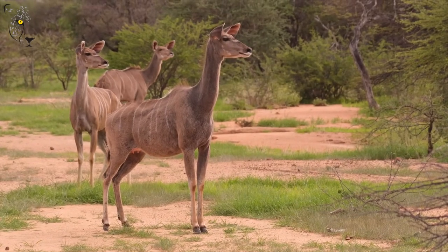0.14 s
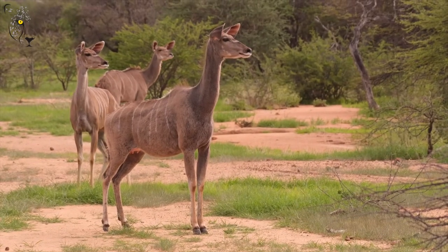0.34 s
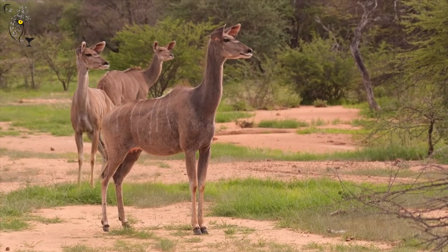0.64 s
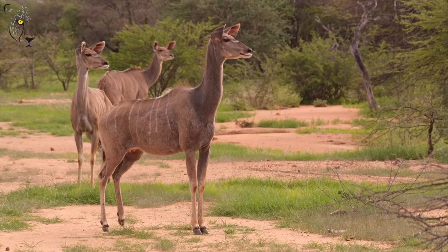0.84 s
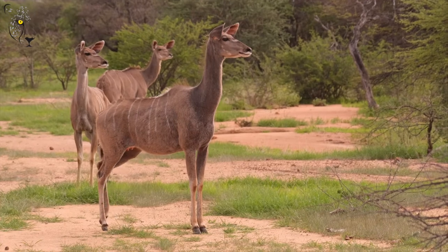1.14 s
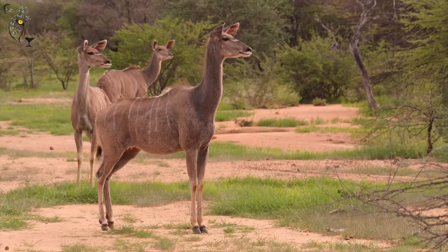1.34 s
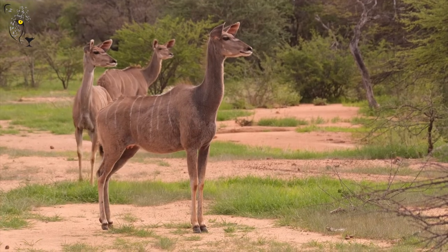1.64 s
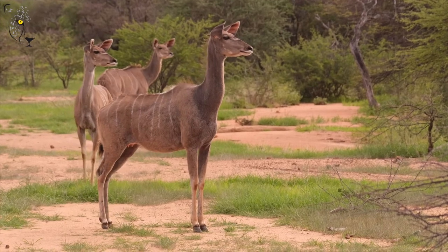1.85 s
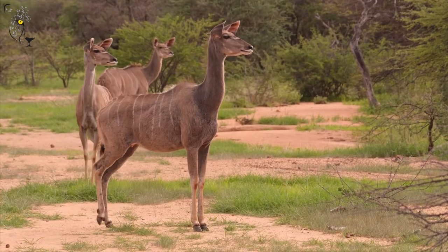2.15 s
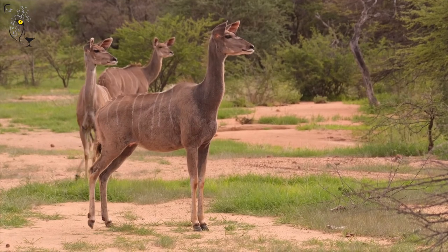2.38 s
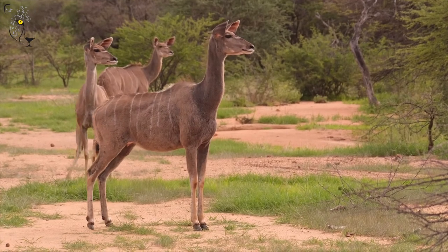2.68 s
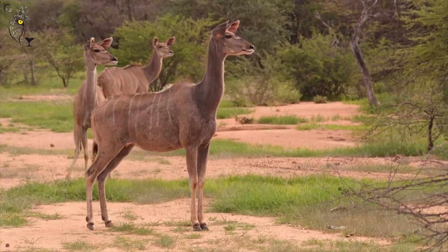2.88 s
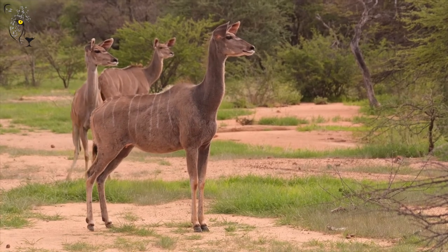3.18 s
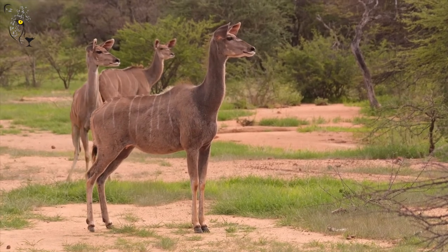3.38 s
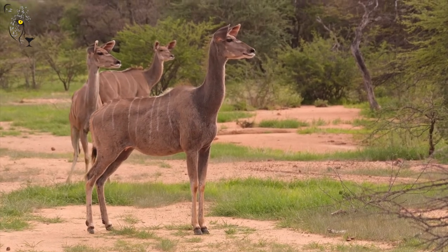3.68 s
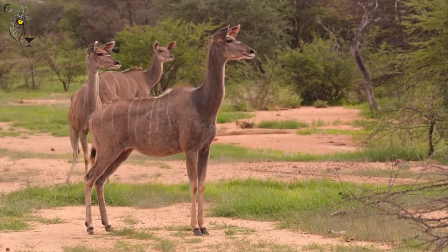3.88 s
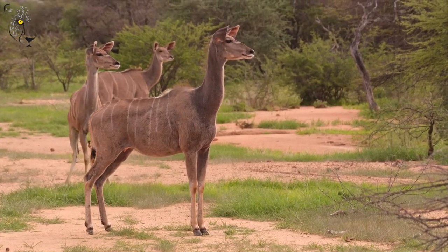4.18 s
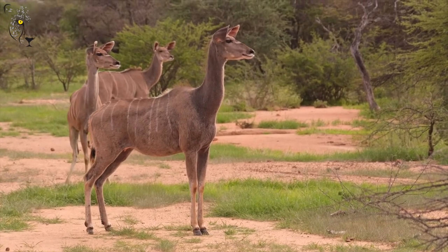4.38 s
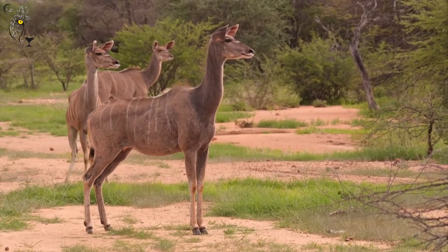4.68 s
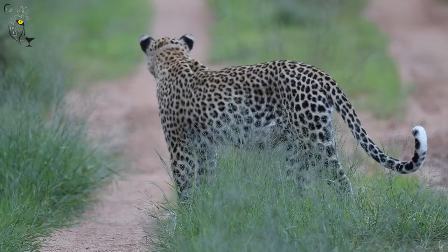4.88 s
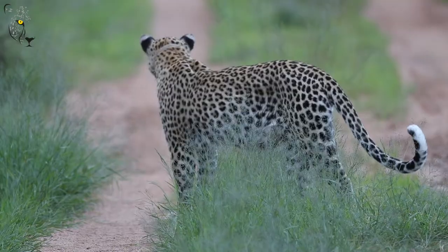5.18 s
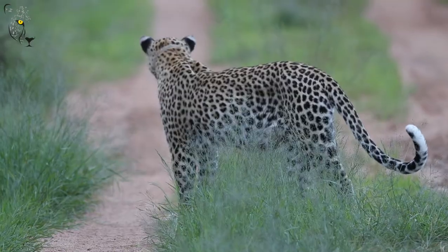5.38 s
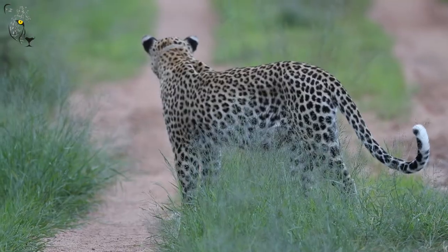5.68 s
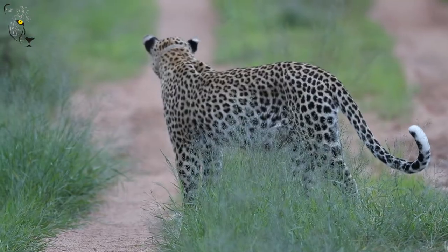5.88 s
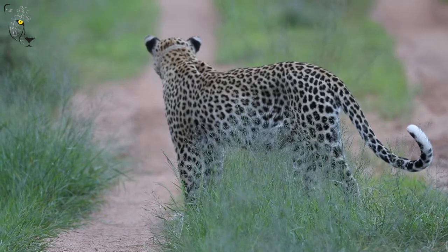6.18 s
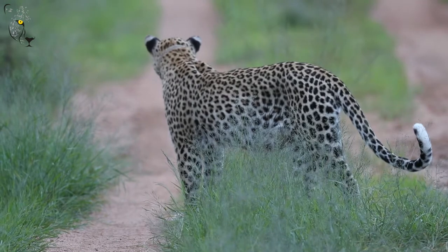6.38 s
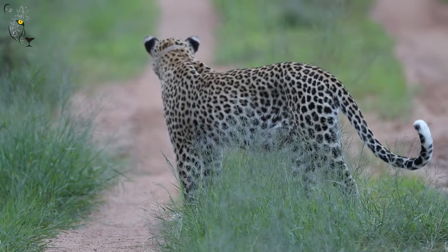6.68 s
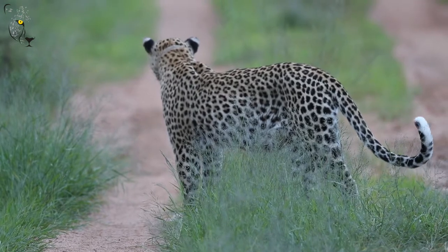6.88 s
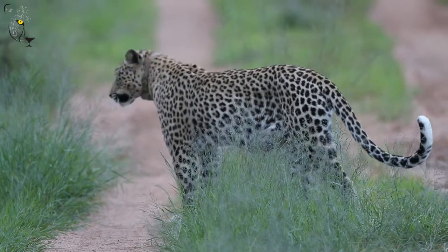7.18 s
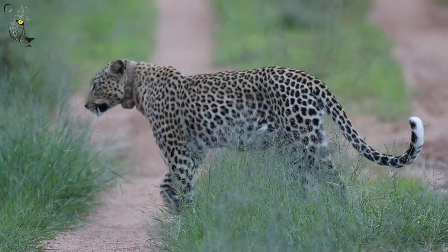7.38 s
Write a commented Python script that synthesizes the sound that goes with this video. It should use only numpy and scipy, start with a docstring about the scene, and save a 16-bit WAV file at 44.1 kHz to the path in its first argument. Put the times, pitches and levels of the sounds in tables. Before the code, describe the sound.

In open bush, a loud hoarse antelope alarm bark is already sounding at 0 seconds, ending by about 0.2, rough and breathy with bright upper resonances; trees return a diffuse echo until about 0.8. A quieter low-voiced bird repeats a phrase about every 1.4 seconds: a half-second bubbling trill of sliding notes, a short hoot, then an arched hoot. Trills begin near 0.1, 1.5, 2.9, 4.3, 5.7 and 7.2. Small birds whistle thin swept tones around 0.4-0.9 and again at 3.0-3.1. Two dull knocks fall near 0.75, with faint ticks scattered until 5.9. Light wind gusts rumble low on the microphone, mainly on the right, easing after 6; soft, nearly centred hiss swells slightly with leaves. At 6.6-6.9 a second hoarse bark erupts, deeper in the chest, with a low puff and an echo cut off around 7.05. The last trill continues to the end.

```python
"""Two hoarse antelope alarm barks in open bush, the first with higher upper resonances: chopped breath
excites resonances, and trees echo it. A low-voiced bird repeats a phrase of gliding tones: a bubbling
trill, a short hoot, an arched hoot. Smaller birds whistle swept tones in two brief clusters.
A few knocks and ticks are noise bursts. Light wind and a low puff with the second bark, both low
coloured noise, rumble on the microphone over a soft, nearly mono hiss.
"""
import sys
import numpy as np
from scipy import signal
from scipy.fft import rfft, irfft, next_fast_len
from scipy.io import wavfile
from scipy.ndimage import uniform_filter1d

SR = 44100
rng = np.random.default_rng(int(sys.argv[2]) if len(sys.argv) > 2 else 0)


def digitize_waveform(pressure):
    """Quantize a signal to 16-bit integers and store it at the path in sys.argv[1].

    Rows of a 2-D input are taken as channels; values are limited to [-1, 1].
    """
    field = np.atleast_2d(pressure).T
    bounded = np.clip(field, -1, 1)
    quanta = np.round(bounded * 32767).astype(np.int16)
    wavfile.write(sys.argv[1], SR, quanta)


N = 332514
TIME = np.arange(N) / SR


def amp(db):
    """Level law: twenty decibels are a factor of ten in amplitude."""
    return 10 ** (np.asarray(db) / 20)


def unit(x):
    """Normalisation to an rms of 1."""
    return x / np.sqrt(np.mean(x ** 2) + 1e-20)


def steady(x, size):
    """Automatic levelling: holds the rms over a sliding window of size samples at 1."""
    return x / np.sqrt(abs(uniform_filter1d(x ** 2, size)) + 1e-20)


def over_hz(points, hz):
    """Interpolation of a spectrum table on a log-frequency axis."""
    f, value = np.transpose(points)
    return np.interp(np.log(hz + 1), np.log(f + 1), value)


def colour(x, points):
    """Zero-phase filtering: weights the spectrum of a sound by a table in dB."""
    return irfft(rfft(x) * amp(over_hz(points, np.fft.rfftfreq(len(x), 1 / SR))), len(x))


def band(x, lo_hz, hi_hz):
    """Zero-phase band-pass with steep skirts, so no delay."""
    hz = np.fft.rfftfreq(len(x), 1 / SR) + 1
    return irfft(rfft(x) / (1 + (lo_hz / hz) ** 16) / (1 + (hz / hi_hz) ** 16), len(x))


def drift(count, per_s):
    """Low-passed random fluctuation of rms 1, with its fastest wanderings at per_s hertz."""
    step = max(SR // int(12 * per_s + 1), 1)  # computed coarsely, then interpolated
    coarse = rng.standard_normal(next_fast_len((count + SR // 2) // step))
    smooth = unit(band(coarse, .01, per_s * step))
    return np.interp(np.arange(count) / step, np.arange(len(smooth)), smooth)


def rise(t, time_s):
    """Exponential approach from 0 to 1 once t passes zero."""
    return 1 - np.exp(-np.maximum(t, 0) / time_s)


def swell(s, half_length):
    """Gaussian envelope of height 1 around time s."""
    return np.exp(-((TIME - s) / half_length) ** 2)


def note_shape(t, attack, release):
    """Envelope of a bird's note: attack, hold and release."""
    return np.tanh(t / attack) * np.tanh((t[-1] - t) / release)


def resonate(x, hz, width):
    """Heterodyne resonance: shifts the curve hz down to zero, low-passes there, and shifts back."""
    turn = np.exp(2j * np.pi * np.cumsum(hz * np.ones(len(x))) / SR)
    r = np.exp(-np.pi * width / SR)
    lowpassed = signal.lfilter([(1 - r) ** 2], [1, -2 * r, r * r], x / turn + 1e-18)
    return 2 * (turn * lowpassed).real


def tone(hz, db):
    """Frequency modulation: a sine whose phase accumulates the pitch curve, with soft ends."""
    edge_s = np.minimum(np.arange(len(hz)), np.arange(len(hz))[::-1]) / SR
    sine = np.sin(2 * np.pi * np.cumsum(hz) / SR)
    return np.sqrt(2) * amp(db) * sine * np.minimum(edge_s / 0.00073, 1)


def add(mix, s, sound):
    """Superposition of a sound on the mix from time s."""
    start = round(s * SR)
    sound = sound[max(-start, 0):]
    part = mix[max(start, 0):][:len(sound)]
    part += sound[:len(part)]


def play(sounds):
    """Superposition of (start, sound) pairs on one track."""
    mix = np.zeros(N)
    for s, sound in sounds:
        add(mix, s, sound)
    return mix


# spectrum of the hiss: hz, relative_db (per Hz)
HISS_SPECTRUM = [(100, 7), (270, -1), (430, -4), (900, -6), (1400, -9.5), (1900, -11), (2800, -13.5),
                 (4500, -16.5), (6500, -20.5), (8800, -23), (10300, -28.5), (11500, -26.5), (12800, -22),
                 (15800, -21.5)]
# likeness of the two ears in the hiss: hz, correlation (0 to 1)
EAR_CORRELATION = [(100, 0.98), (500, 0.86), (2000, 0.87), (5000, 1), (9000, 1), (13000, 0.97)]
# the breeze stirs the leaves: centre_s, half_length_s, lift_db
LEAF_RUSTLES = [(.9, 0.22, 3), (2.44, .13, 3), (2.787, 0.15, 2), (3.65, .2, 1), (5.125, 0.28, 3),
                (6.504, 0.27, 1.5)]
# faint narrow bands in the distant sound of the bush: centre_hz, width_hz, level_db
DISTANT_BANDS = [(551, 97, -70), (1852, 430, -73.5)]
HISS_DB = -63  # rms between 2 and 15 kHz, before the rustles


def air(far_follows=2.2, far_flicker_db=2):
    """Partially correlated noise: a hiss whose middle and two far bands swell with the leaves."""
    same = np.clip(over_hz(EAR_CORRELATION, np.fft.rfftfreq(N, 1 / SR)), 0, 1)
    shared, *own = rfft(rng.standard_normal((3, N)))
    ears = [irfft(np.sqrt(same) * shared + np.sqrt(1 - same) * z, N) for z in own]
    hiss = np.array([colour(ear, HISS_SPECTRUM) for ear in ears])
    hiss = hiss * amp(HISS_DB) / np.std(band(hiss.mean(0), 2000, 15000))
    leaves_db = sum(db * swell(s, half) for s, half, db in LEAF_RUSTLES)
    far = 0
    for hz, width, db in DISTANT_BANDS:
        far_db = db + far_follows * leaves_db + far_flicker_db * drift(N, 15)
        far = far + amp(far_db) * unit(resonate(rng.standard_normal(N), hz, width))
    middle = np.array([band(side, 203, 3560) for side in hiss])
    return hiss + far + (amp(leaves_db) - 1) * middle


# spectrum of the rumble: hz, relative_db (per Hz)
RUMBLE_SPECTRUM = [(12, -14.5), (25, -5), (42, -6.5), (70, -8.5), (130, -19), (220, -32), (400, -44.5),
                   (3000, -75)]
# low rumbles, stronger on the right: wind gusts, and at 6.82 s a low puff with the second bark:
# centre_s, half_length_s, level_db
LOW_RUMBLES = [(0.09, 0.055, -30), (0.287, 0.16, -35), (1.145, 0.044, -41), (3.121, 0.13, -34.5),
               (3.333, 0.036, -33), (3.898, 0.3, -44), (4.957, 0.27, -44), (5.07, 0.027, -31),
               (5.607, 0.17, -39), (5.923, 0.027, -37.5), (6.82, 0.13, -38)]
BREEZE_DB, BREEZE_WANDER_DB, BREEZE_WANDER_HZ = -49.5, 1.6, 3
BREEZE_DROPS_S, BREEZE_DROP_DB = 6.05, 4.5  # the breeze eases near the end


def low_rumble(sheltered_db=-54, leak_db=-13):
    """Low-frequency noise: wind gusts and one bark puff over a wandering breeze, stronger on the right."""
    drop_db = BREEZE_DROP_DB * rise(TIME - BREEZE_DROPS_S, 0.09)
    breeze = amp(BREEZE_DB - drop_db + BREEZE_WANDER_DB * drift(N, BREEZE_WANDER_HZ))
    # independent rumbles add in power
    right = np.hypot(breeze, sum(amp(db) * swell(s, half) for s, half, db in LOW_RUMBLES))
    left = np.hypot(amp(sheltered_db), amp(leak_db) * right)
    rumbles = [steady(colour(rng.standard_normal(N), RUMBLE_SPECTRUM), size=5000) for _ in range(2)]
    return np.array([left * rumbles[0], right * rumbles[1]])


# reverberation time of the bush: hz, t60_s
BUSH_DECAY = [(150, .3), (500, 0.29), (1100, 0.74), (2500, 0.53), (8000, 0.26)]


def bush(x, spread=0.081):
    """Diffuse reverberation: sparse echoes from trunks and thickets, each band decaying at its own rate."""
    sparse = rng.random((2, SR)) < 2000 / SR  # about 2000 echoes a second
    taps = rng.standard_normal((2, SR)) * sparse * (TIME[:SR] > .012)
    hz, t, z = signal.stft(taps, SR, nperseg=256)
    decay = amp(-60 * t / over_hz(BUSH_DECAY, hz)[:, None])
    mid, side = signal.istft(z * decay, SR, nperseg=256)[1]
    tails = np.array([mid + spread * side, mid - spread * side]) / np.linalg.norm(mid)
    return signal.fftconvolve(x[None], tails, axes=1)[:, :N]


# thin dry ticks: start_s, level_db (before decay), centre_hz, width_hz
DRY_TICKS = [(1.408, -51, 12400, 7040), (2.44, -45, 13340, 2400), (4.81, -48, 2200, 2490),
             (4.84, -57, 8900, 8000), (4.979, -58, 14160, 4010), (5.25, -50, 2964, 2000),
             (5.594, -54, 13100, 6000), (5.922, -46, 1500, 1490)]


def tick(s, db, hz, width):
    """Impulsive band noise: a tiny snap that decays within milliseconds."""
    t = np.arange(0, .02, 1 / SR)
    snap = unit(resonate(rng.standard_normal(len(t)), hz, width))
    return s, amp(db) * snap * np.exp(-t / 0.0026)


# dull knocks nearby: start_s, level_db (before decay), decay_s
DULL_KNOCKS = [(0.7391, -37.5, 0.01), (.774, -34.5, 0.015), (1.197, -52, 0.0063)]
# spectrum of a knock: hz, relative_db (per Hz)
KNOCK_SPECTRUM = [(50, -6), (130, 2), (350, -1), (850, -6), (1600, -14), (2500, -23), (4500, -32),
                  (9000, -46)]


def knock(s, db, decay):
    """Damped impact: a dull crunch of coloured noise that dies exponentially with no ring."""
    t = np.arange(0, .12, 1 / SR)
    crunch = unit(colour(rng.standard_normal(len(t)), KNOCK_SPECTRUM))
    return s, amp(db) * crunch * np.exp(-t / decay) * np.minimum(t / 0.00037, 1)


# small birds: start_s, length_s, start_hz, end_hz, bend (below 1 glides early, above 1 late), level_db
BIRD_WHISTLES = [(0.441, 0.13, 3620, 3440, 1.3, -56), (.458, 0.13, 3058, 2160, 5.9, -51),
                 (0.459, .115, 1775, 1640, 3.7, -64), (0.65, 0.019, 2300, 2440, 1, -52.5),
                 (0.653, 0.059, 2004, 2190, 5, -52.5), (.706, 0.021, 2980, 2410, 0.46, -49),
                 (0.724, 0.022, 1956, 2160, 1.3, -45.5), (.834, 0.06, 3080, 1246, 0.4, -61),
                 (3.017, 0.066, 6600, 3440, 1.3, -56.5), (3.03, .035, 3270, 2350, 1.1, -60),
                 (3.07, 0.057, 2350, 2250, 1, -65), (3.075, .055, 3460, 3220, 0.66, -65)]


def whistle(s, length, start_hz, end_hz, bend, db, waver=0.01):
    """Swept tone: a thin glide whose random pitch waver grows harsh where it sweeps fast."""
    t = np.arange(0, length, 1 / SR)
    hz = start_hz + (end_hz - start_hz) * (t / length) ** bend
    sweep_khz_per_s = np.minimum(abs(np.gradient(hz)) * SR / 1000, 70)
    harsh = .0022 * uniform_filter1d(sweep_khz_per_s, size=600)
    wavering_hz = hz * (1 + (waver + harsh) * drift(len(hz), 870))
    return s, tone(wavering_hz, db) * note_shape(t, attack=0.0076, release=0.0037)


def throat_db(hz, tuned_hz=850, width_hz=330):
    """Resonance skirt: the low bird's swollen throat weakens notes above its tuning, at their very top."""
    return -10 * np.log10(1 + (2 * np.maximum(hz - tuned_hz, 0) / width_hz) ** 2)


# the low bird's hoots: start_s, length_s, top_hz (before the sag), level_db (before the throat)
LOW_BIRD_HOOTS = [(0.617, 0.042, 870, -42.5), (1.038, 0.088, 1032, -42.5), (2.039, 0.037, 876, -43),
                  (2.461, 0.08, 1045, -42.5), (3.458, 0.045, 880, -42), (3.884, 0.083, 1033, -42.5),
                  (4.888, 0.039, 870, -44.5), (5.326, 0.086, 1035, -43.5), (6.313, 0.038, 870, -43.5)]
HOOT_RISE_S, HOOT_FALL_S, HOOT_SAG_HZ_PER_S = 0.0156, 0.011, 1560


def hoot(s, length, top_hz, db, low_hz=690):
    """Arched glide: one pure note whose pitch springs up, sags, and drops back."""
    t = np.arange(0, length, 1 / SR)
    height = np.tanh((t / HOOT_RISE_S) ** 1.37) * np.tanh((length - t) / HOOT_FALL_S)
    hz = low_hz + (top_hz - HOOT_SAG_HZ_PER_S * t - low_hz) * height + 5 * drift(len(t), 100)
    attack = 0.005 if length > .06 else .011  # the short hoots swell in more softly
    return s, tone(hz, db + throat_db(hz)) * note_shape(t, attack, release=0.0071)


# the low bird's trills: first_slur_s, last_slur_s, level_db (before droop, dips and throat)
LOW_BIRD_TRILLS = [(0.076, .541, -44.5), (1.474, 1.948, -44), (2.911, 3.383, -44), (4.325, 4.795, -45),
                   (5.745, 6.212, -44), (7.188, 7.66, -45)]
# the tops of the slurs climb at once, sag steadily, and droop as the breath runs out
TRILL_TOP_HZ, TRILL_CLIMB_HZ, TRILL_CLIMB_S, TRILL_SAG_HZ_PER_S = 1090, 111, 0.012, 235
TRILL_DROOP_HZ, TRILL_DROOP_DB, TRILL_DROOP_S = 190, 4, 0.0328
# the first slurs run together; then the voice dips between them
SLURS_PART_S, SLUR_DIP_DB = 0.0856, 12
SLUR_RISE, SLUR_SLIDE = .16, .39  # shares of one cycle


def trill(first, last, db, count=16, low_hz=675, merged_hz=110, hurry=0.192,
          voice_edge=0.048, slur_round=0.295, onset_s=0.002):
    """Periodic frequency modulation: slurs jump up and slide down, slow a little, and sink at the end."""
    length = last - first
    t = np.arange(-.006, length + .014, 1 / SR)
    slur = np.arange(count - 1)
    gaps = 1 - hurry * np.exp(-slur / 2.0) + 0.003 * slur
    tops = length * np.append(0, np.cumsum(gaps)) / gaps.sum()
    tops = np.concatenate([[-tops[1]], tops, [2 * tops[-1] - tops[-2]]])  # one more at either end
    cycle = (np.interp(t, tops, np.arange(count + 2)) + SLUR_RISE) % 1
    to_end = SLUR_RISE + SLUR_SLIDE - cycle
    height = np.clip(np.minimum(cycle / SLUR_RISE, to_end / SLUR_SLIDE), 0, 1)
    height = height + slur_round * height * (1 - height)
    voiced = np.clip(np.minimum(cycle, to_end) / voice_edge, 0, 1)
    droop = np.exp(np.minimum(t - length, 0) / TRILL_DROOP_S)
    climb_hz = TRILL_CLIMB_HZ * (1 - rise(t, TRILL_CLIMB_S))
    top_hz = TRILL_TOP_HZ - climb_hz - TRILL_SAG_HZ_PER_S * t - TRILL_DROOP_HZ * droop
    dip_db = -SLUR_DIP_DB * np.tanh((t / SLURS_PART_S) ** 2)
    bottom_hz = low_hz + merged_hz * amp(dip_db)  # slurs that run together do not fall as far
    hz = bottom_hz + (top_hz - bottom_hz) * height + 12 * drift(len(t), 73)
    level_db = db - TRILL_DROOP_DB * droop + throat_db(hz) + dip_db * (1 - voiced)
    level_db = level_db + 1.16 * drift(len(t), 44)
    return first + t[0], tone(hz, level_db) * rise(t - t[0], onset_s)


# side part of the near reflections: hz, level_db (re the direct bark)
NEAR_SCATTER = [(250, -37), (500, -15), (1000, -8.5), (2500, -7.5), (5000, -2.5), (12000, 0)]


def scatter(x, decay=0.012):
    """Early scattering: near bushes throw a loud call back at once, differently to each ear."""
    t = np.arange(0, .03, 1 / SR)
    taps = rng.standard_normal(len(t)) * np.exp(-t / decay)
    side = colour(signal.fftconvolve(x, taps / np.linalg.norm(taps))[:N], NEAR_SCATTER)
    return np.array([x + side, x - side])


# resonances of chest, throat and muzzle: centre_hz, width_hz, level_db (before the lifts of each bark)
BODY_RESONANCES = [(172, 51, -4.5), (196.6, 29, -12.5), (245, 18.2, 4.5), (276, 23, 2.5), (348.4, 20, -0.5),
                   (469.4, 57, 2.5), (557, 29, -2.5), (657.6, 21.4, -1.5), (734, 10.7, -3), (805, 34, 0.5),
                   (841.5, 17, 6), (958, 99, -0.5), (1084, 25, -1), (1198, 39, -2), (1304, 137, -7.5),
                   (1580, 91, -9), (1710, 65, -7), (2144, 280, -17), (2716, 91, -26), (2980, 640, -27.5),
                   (4740, 320, -35), (5560, 440, -44.5), (6200, 2300, -54.5)]
# the hiss flares as the mouth closes: after_start_s, half_length_s, lift_db
CLOSING_FLARE = (0.202, 0.013, 4.9)
BARK_ATTACK_S, BARK_RELEASE_DB_PER_S = 0.066, 328
MOUTH_CLOSES_S = 0.093  # the mouth starts to close this long before the effort ends
# the mouth uncovers the upper bands late and covers them early: delay (s), rise (s), fall (dB per s)
MOUTH_DELAY_S, MOUTH_RISE_S, MOUTH_FALL_DB_PER_S = 0.02, 0.018, 92
RASP_DELAY_S, RASP_RISE_S, RASP_FALL_DB_PER_S = 0.023, 0.013, 90


def bark(s, length, db, mouth_db, rasp_db, hiss_db, chest_hz, chest_db, top_scale, top_db,
         flap_hz=88, jitter=.22, rough=0.64, closing=0.35, swell_db=3.5):
    """Source and filter: slack folds flap unevenly and chop the air; the mouth lets out the resonances."""
    t = np.arange(-.1, length + .2, 1 / SR)
    turns = np.cumsum(flap_hz * np.exp(jitter * drift(len(t), 90.3))) / SR
    flaps = np.diff(np.floor(turns), prepend=0)  # one click a turn
    puffs = (0.82 + np.exp(-(turns % 1) / 0.58)) * rng.standard_normal(len(t))
    drive = (1 - rough) * unit(flaps) + rough * unit(puffs)

    voice = 0
    for hz, width, peak_db in BODY_RESONANCES:
        # the highest resonances sink as the mouth closes, and all of them swell by turns
        sink_octaves = closing * (t - length / 2) * (hz > 2000)
        path_hz = hz * (top_scale if hz > 2500 else 1) * 2 ** -sink_octaves
        lift_db = chest_db * (hz < 400) + top_db * (hz > 2500)
        gain = amp(peak_db + lift_db + swell_db * drift(len(t), 13.5)) * np.sqrt(width)
        voice = voice + gain * steady(resonate(drive, path_hz, width), size=6000)

    effort = amp(db - BARK_RELEASE_DB_PER_S * np.maximum(t - length, 0)) * rise(t, BARK_ATTACK_S)
    closing_s = np.maximum(t - length + MOUTH_CLOSES_S, 0)
    mouth = rise(t - MOUTH_DELAY_S, MOUTH_RISE_S) * amp(-MOUTH_FALL_DB_PER_S * closing_s)
    rasp = rise(t - RASP_DELAY_S, RASP_RISE_S) * amp(-RASP_FALL_DB_PER_S * closing_s)
    flare_s, flare_half_s, flare_db = CLOSING_FLARE
    hiss = amp(hiss_db + flare_db * np.exp(-((t - flare_s) / flare_half_s) ** 2)) * rasp
    parts = [(chest_hz, 680, 1), (680, 1500, amp(mouth_db) * mouth),
             (1500, 3900, amp(rasp_db) * rasp), (4300, 14000, hiss)]
    call = sum(gain * steady(band(voice, lo_hz, hi_hz), size=900) for lo_hz, hi_hz, gain in parts)
    return s + t[0], effort * call


# alarm barks: start_s, length_s, effort_db, then mouth_db, rasp_db, hiss_db (bands re effort),
# lowest_hz, chest_lift_db, top_scale (pitch ratio of the resonances above 2.5 kHz), top_lift_db (theirs),
# echo_db (re the bark), echo_breaks_off_s (after the start)
ALARM_BARKS = [(-.135, 0.27, -20, -6, -13, -33.5, 161, -2, 1.12, -4.5, -14, .9),
               (6.636, .28, -20.5, -3, -11, -31, 121, 1.8, 1.005, .8, -15.5, 0.419)]


def antelope_barks(break_s=0.0091):
    """Direct sound, early reflections and reverberation: each bark and its echo from the trees."""
    out = 0
    for s, *voice, echo_db, echo_s in ALARM_BARKS:
        call = play([bark(s, *voice)])
        echo = amp(echo_db) * bush(call) * rise(s + echo_s - TIME, break_s)
        out = out + scatter(call) + echo
    return out


def scene():
    """Superposition: antelope barks and birds straight ahead, in the open bush."""
    background = air() + low_rumble()
    taps = play([tick(*row) for row in DRY_TICKS] + [knock(*row) for row in DULL_KNOCKS])
    small_birds = play(whistle(*row) for row in BIRD_WHISTLES)
    low_bird = play([hoot(*row) for row in LOW_BIRD_HOOTS] + [trill(*row) for row in LOW_BIRD_TRILLS])
    echoes = bush(amp(-15.5) * low_bird + amp(-15.0) * small_birds)
    return background + taps + small_birds + low_bird + echoes + antelope_barks()


def record(dry, edge_hz=15780):
    """Band limiting: the recorder's linear-phase low-pass."""
    lowpass = signal.firwin(511, edge_hz, window=("kaiser", 9), fs=SR)
    return signal.oaconvolve(dry, lowpass[None], "same")


dry = scene()
out = record(dry)
digitize_waveform(out)
```